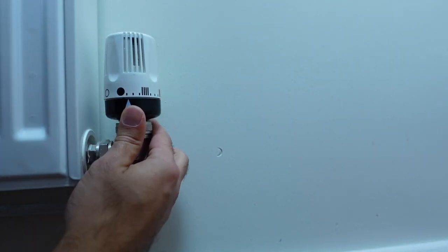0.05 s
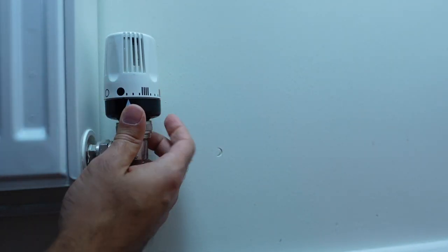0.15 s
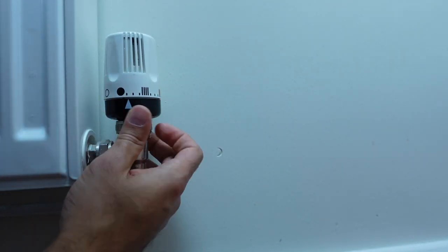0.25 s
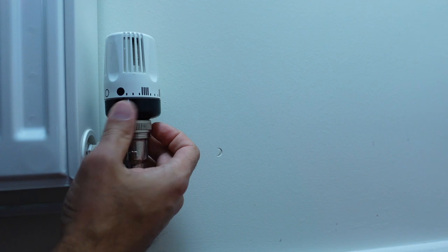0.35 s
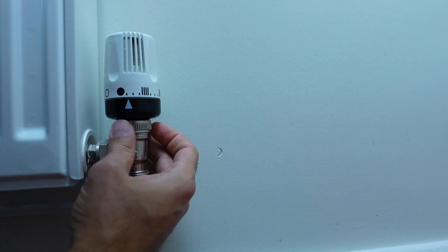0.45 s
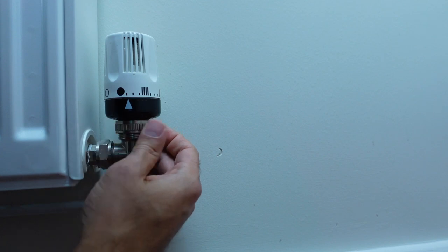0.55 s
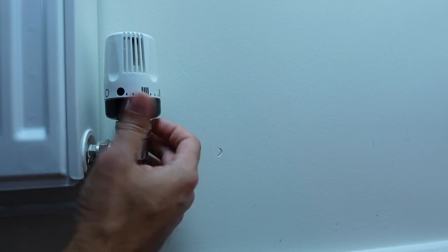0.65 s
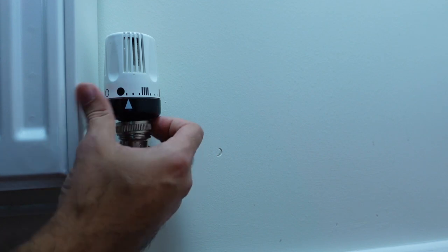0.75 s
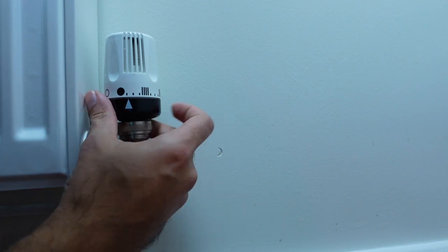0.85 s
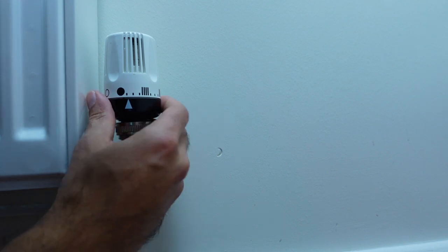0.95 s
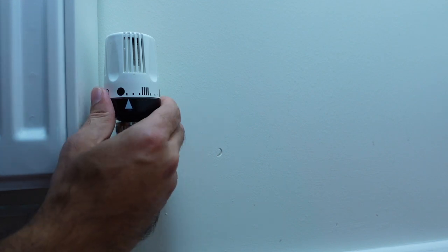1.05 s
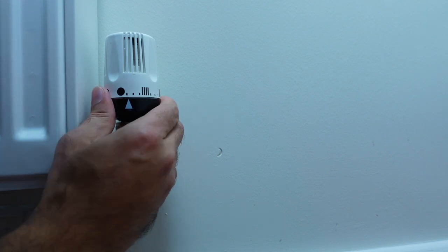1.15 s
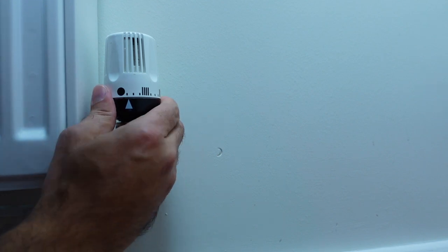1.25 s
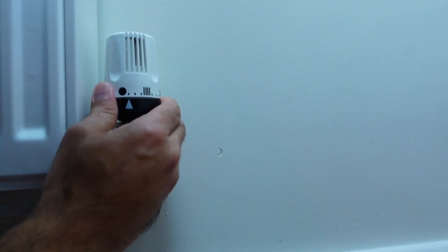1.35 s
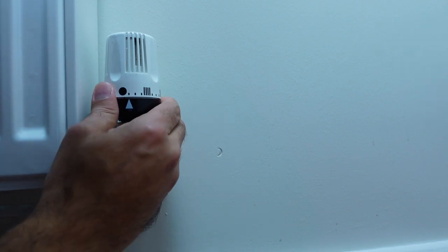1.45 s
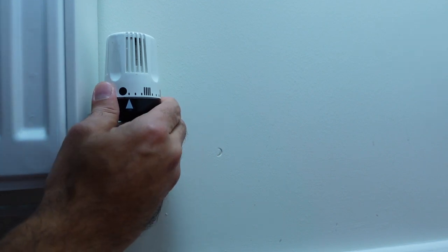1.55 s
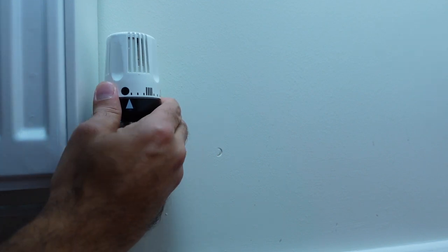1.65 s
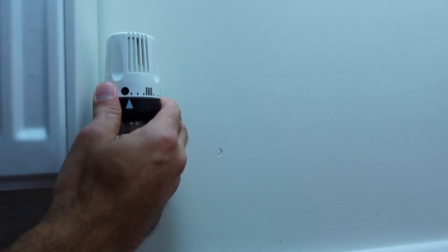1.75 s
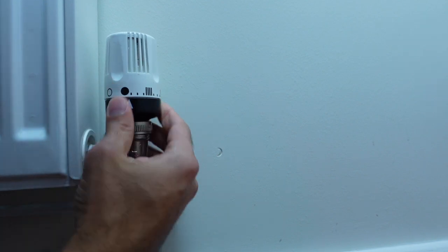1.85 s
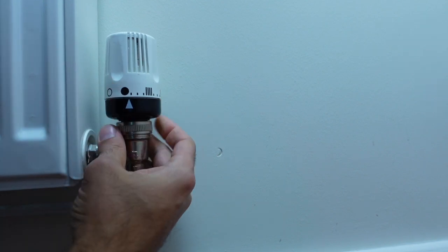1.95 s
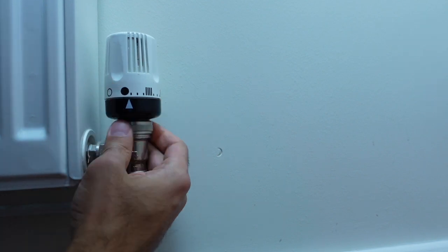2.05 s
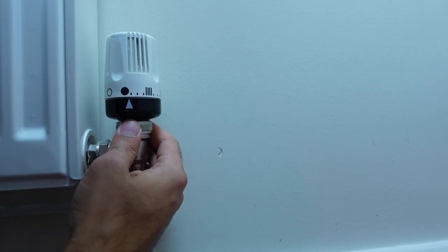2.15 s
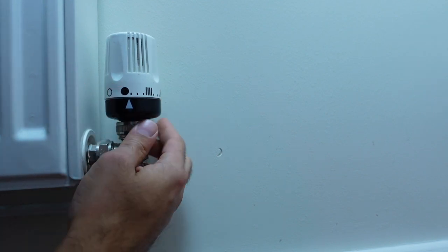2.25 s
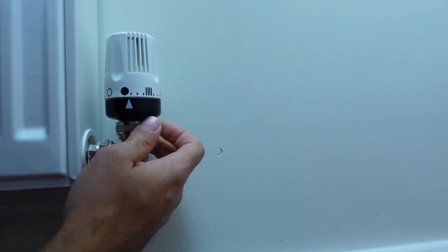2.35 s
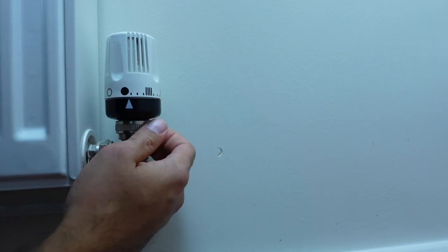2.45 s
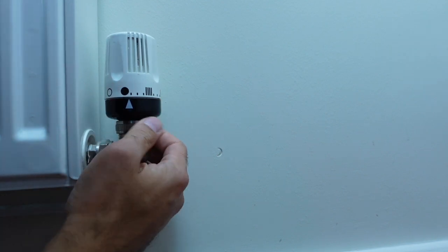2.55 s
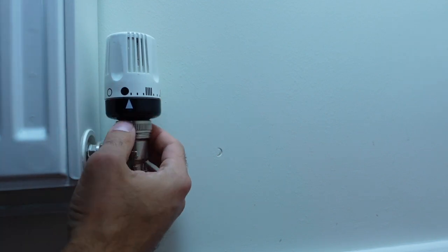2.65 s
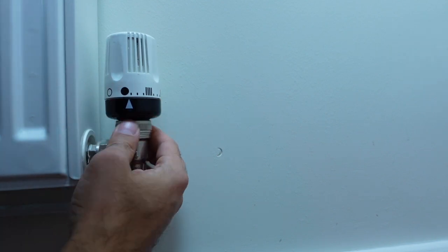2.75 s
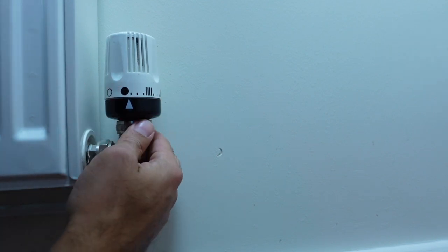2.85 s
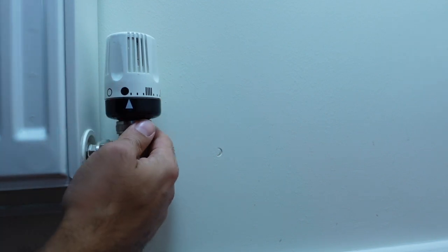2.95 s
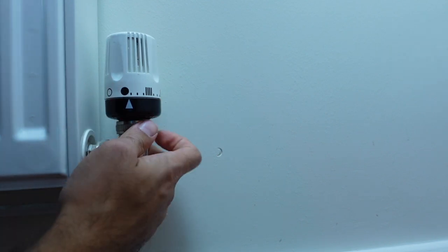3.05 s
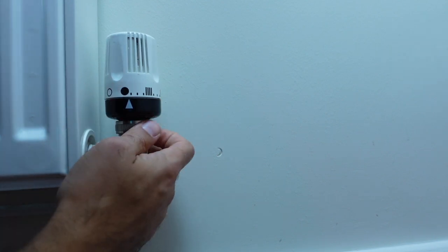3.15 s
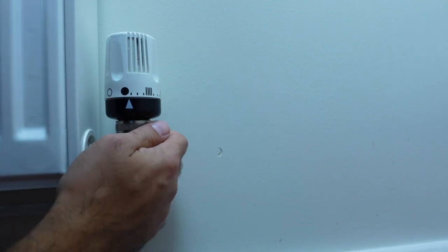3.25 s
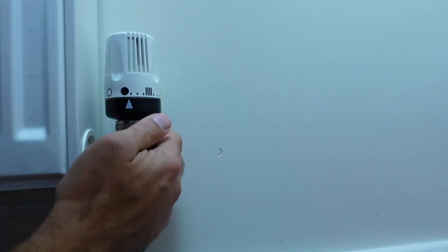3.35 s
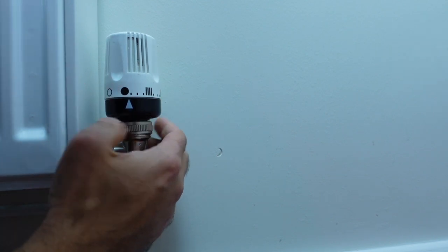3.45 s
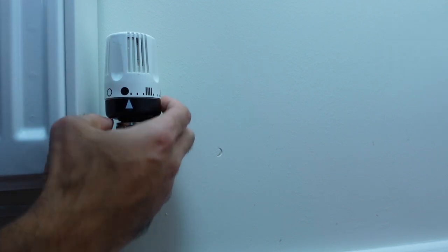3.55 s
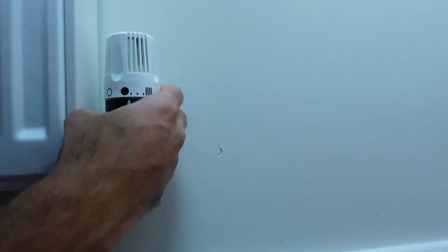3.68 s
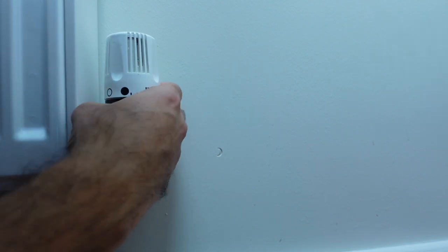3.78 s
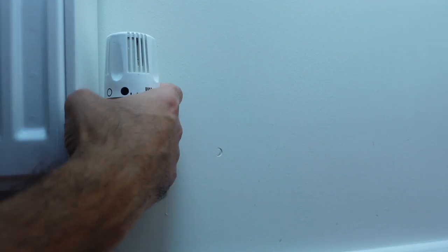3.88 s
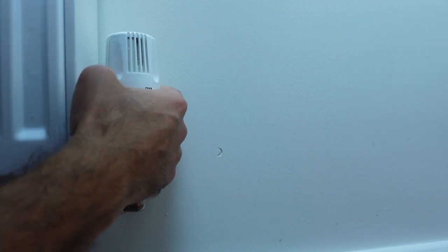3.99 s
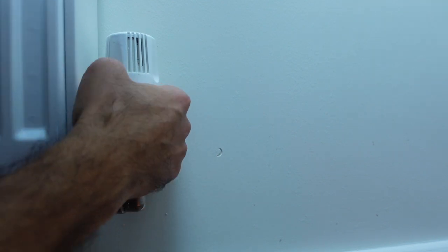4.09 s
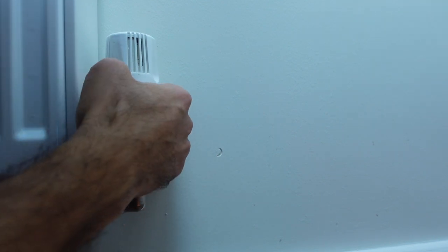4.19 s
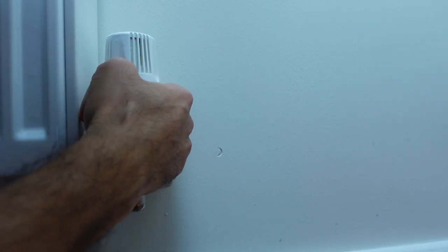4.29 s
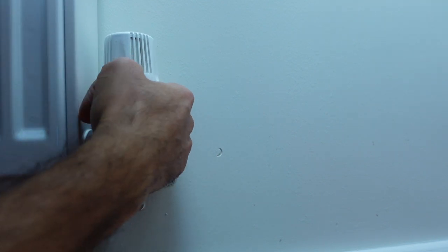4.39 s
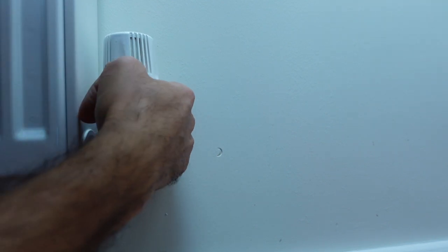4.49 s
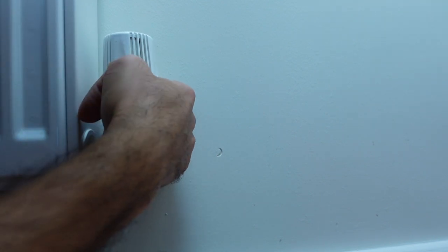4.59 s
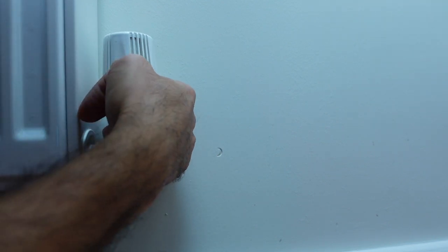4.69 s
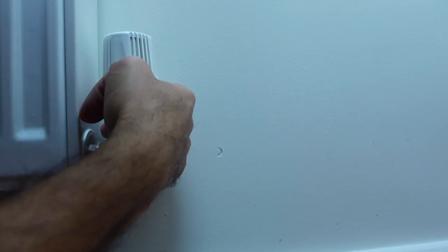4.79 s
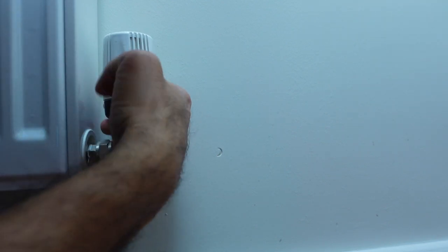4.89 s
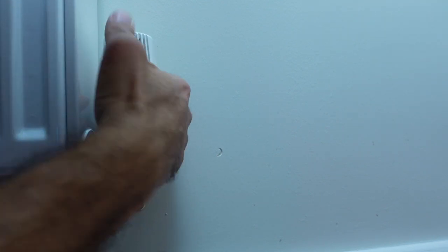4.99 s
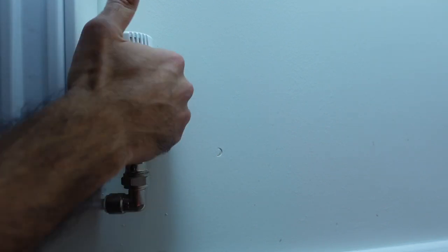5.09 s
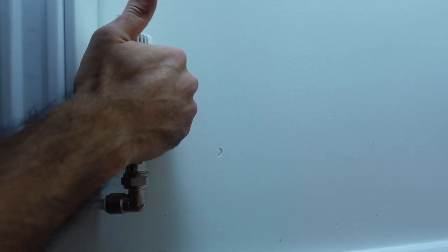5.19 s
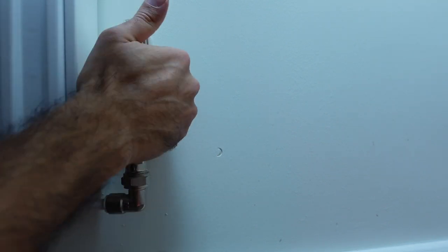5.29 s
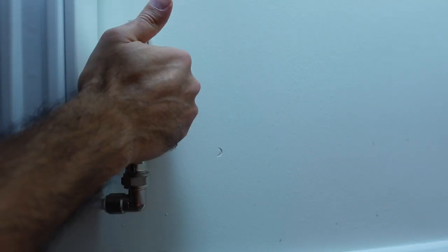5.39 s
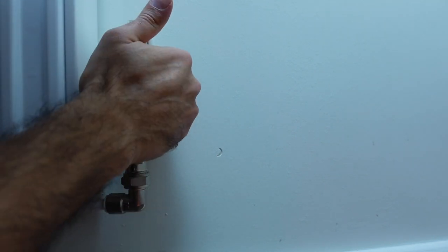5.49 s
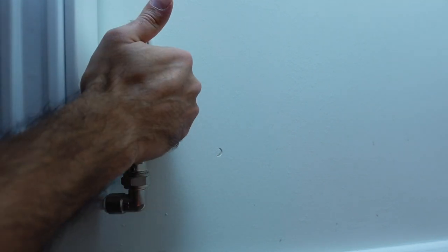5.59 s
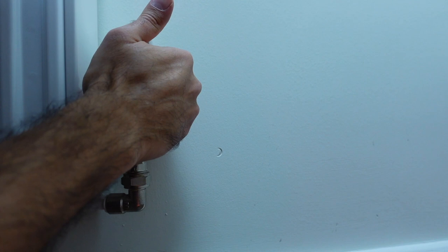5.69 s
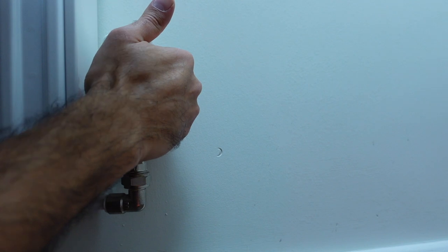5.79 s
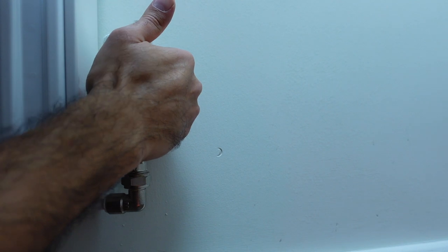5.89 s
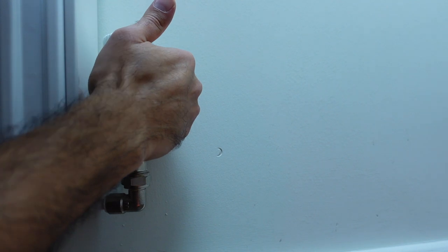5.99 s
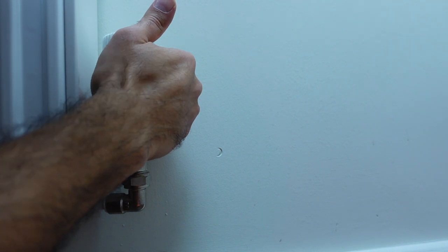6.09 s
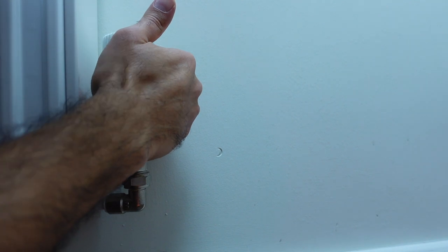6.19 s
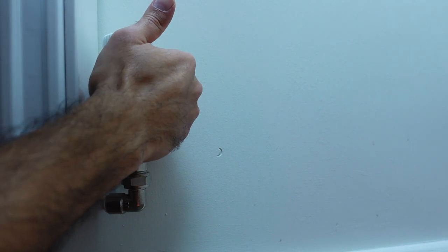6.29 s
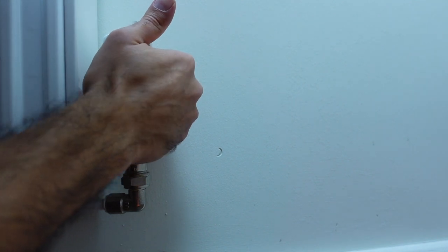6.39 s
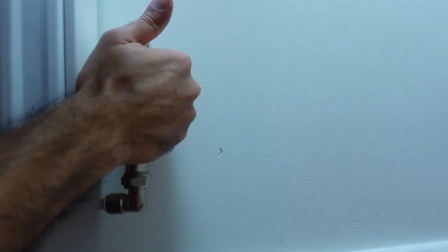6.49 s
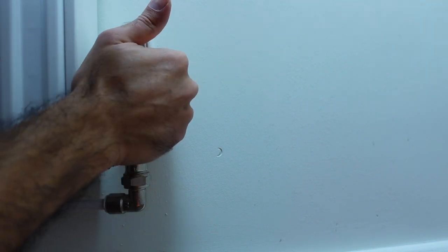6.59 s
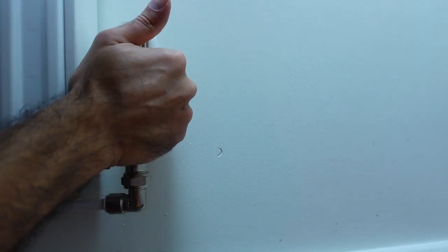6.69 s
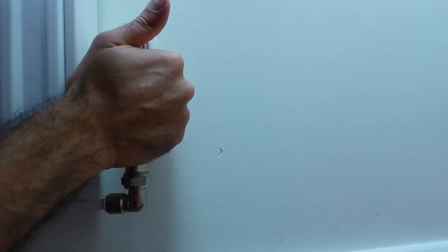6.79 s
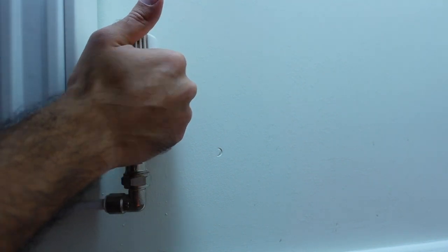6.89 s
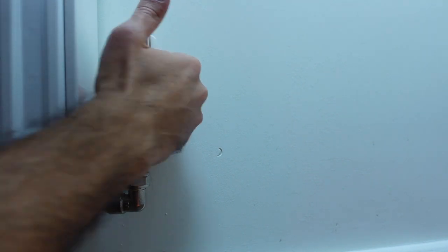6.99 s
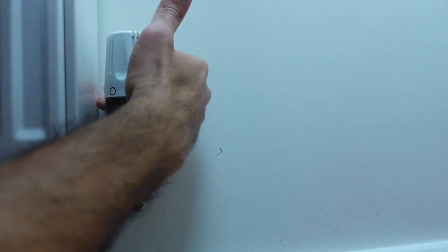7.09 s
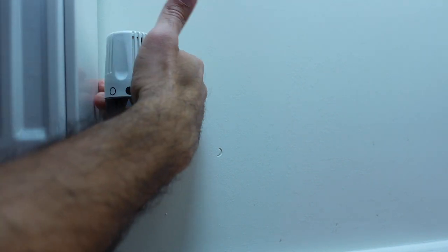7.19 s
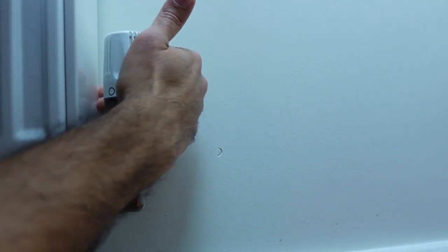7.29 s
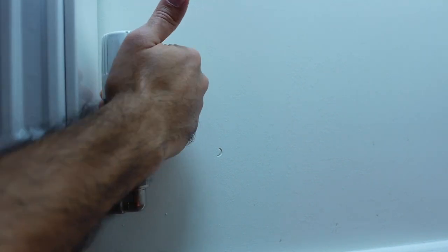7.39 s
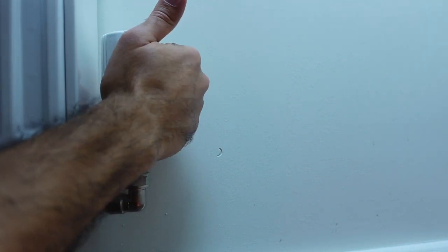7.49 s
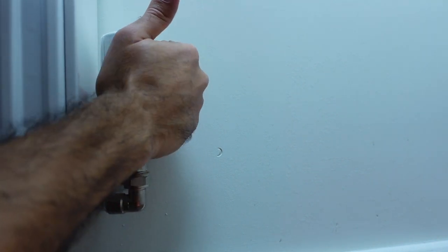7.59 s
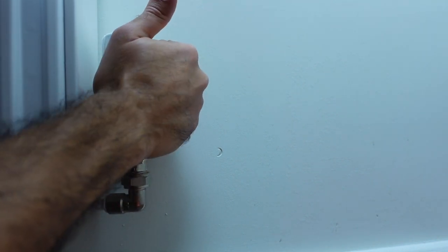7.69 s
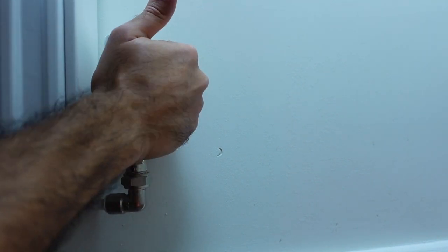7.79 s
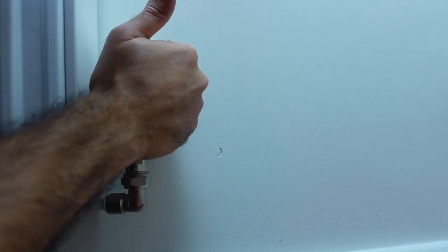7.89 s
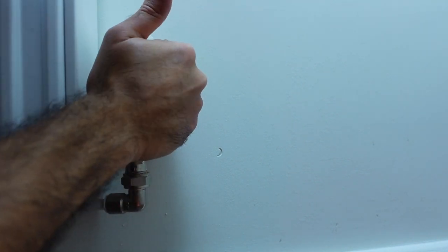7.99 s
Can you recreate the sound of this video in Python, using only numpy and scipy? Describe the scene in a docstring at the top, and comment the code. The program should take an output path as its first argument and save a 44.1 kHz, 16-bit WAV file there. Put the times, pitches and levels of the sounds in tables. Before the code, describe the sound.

Short jerky rasps of a metal thread come in two clusters, with bright collar clinks, the strongest near the middle. Soft plastic ticks and skin rubbing follow, nearly quiet. Then a very bright, loud snap bursts out and rings off the hard walls, followed by a dull padded knock on the pipe and light handling. Heard close, over quiet air and low panel rumble.

```python
"""Unscrewing a radiator valve head

A hand unscrews the metal collar of a plastic valve head in a bare, ringing room: the thread scrapes by stick-slip.
The loose collar clinks and the plastic shell ticks as struck modes, and each contact also rings the pipe.
The head snaps off with a sharp noise crack, bumps heavily on the valve as damped pipe and panel modes,
and is shifted about in the fingers with hissing and squeaking skin. Filtered noise gives air and rumble."""
import sys
import numpy as np
from scipy import signal
from scipy.fft import rfft, irfft
from scipy.io import wavfile

SR = 44100
rng = np.random.default_rng(int(sys.argv[2]) if len(sys.argv) > 2 else 0)


def master(y):
    """Save y as 16-bit WAV."""
    cut = np.clip(np.atleast_2d(y).T, -1, 1)
    pcm = np.round(cut * 32767)  # scale
    wavfile.write(sys.argv[1], SR, pcm.astype(np.int16))


N = 354563
TAIL_S = np.arange(SR) / SR  # time axis of one contact


def undb(db):
    """Level to amplitude: decibels become a gain."""
    return 10 ** (np.asarray(db) / 20)


def unit(x):
    """Power normalisation: scale to rms 1."""
    return x / np.sqrt(np.mean(x ** 2))


def blow(x, db):
    """Onset level: scale a hit so that the rms of its first 20 ms has this level."""
    return x * undb(db) / np.sqrt(np.mean(x[:SR // 50] ** 2))


def add(out, start_s, x):
    """Superposition: mix x in from this time."""
    i = max(int(start_s * SR), 0)
    out[i:i + len(x)] += x[:len(out) - i]


def through(x, response):
    """Convolution: a linear system answers x with its impulse response."""
    return signal.fftconvolve(x, response)[:len(x)]


def on_log_axis(hz, points):
    """Logarithmic pitch axis: read (hz, value) points at these frequencies."""
    f, value = np.transpose(points)
    return np.interp(np.log(hz + 1), np.log(f), value)


def colour(x, points, size=8192):
    """Minimum phase: a causal filter made from a spectrum of (hz, level_db) points."""
    log_gain = np.log(undb(on_log_axis(np.fft.rfftfreq(size, 1 / SR), points)))
    cepstrum = irfft(log_gain)
    # folding the cepstrum onto positive times makes the filter causal
    cepstrum[1:size // 2] *= 2
    cepstrum[size // 2 + 1:] = 0
    return through(x, irfft(np.exp(rfft(cepstrum))))


def ring(modes):
    """Modal superposition: decaying sines with random phases for each contact point, at unit energy."""
    y = 0
    for hz, db, t60_s in modes:
        decay = np.exp(-np.log(1000) * TAIL_S / t60_s)
        y = y + undb(db) * decay * np.sin(2 * np.pi * (hz * TAIL_S + rng.random()))
    return y / np.sqrt(np.sum(y ** 2))


def favour(modes, hz, lift_db, octaves):
    """Modal excitation: the place of contact decides what speaks, so rows near hz are lifted."""
    lifted = []
    for f, db, *rest in modes:
        nearness = np.exp(-(np.log2(f / hz) / octaves) ** 2)
        lifted.append((f, db + lift_db * nearness, *rest))
    return lifted


def burst(decay_s):
    """Micro-slip at a contact: a crowd of tiny slips, as noise that decays exponentially."""
    return rng.standard_normal(len(TAIL_S)) * np.exp(-TAIL_S / decay_s)


def onset(rise_s):
    """Contact compliance: a soft contact builds up with this time constant."""
    return 1 - np.exp(-TAIL_S / rise_s)


def walk(rate_hz):
    """Slow random modulation: chance values of spread near 1, joined by straight lines."""
    knots = rng.standard_normal(4096)
    return np.interp(np.arange(N) / SR * rate_hz, np.arange(len(knots)), knots)


def slips(rate_hz, spread_db):
    """Stick-slip: impulses at random moments, a few much larger than the rest."""
    happens = rng.random(N) < rate_hz / SR
    size = undb(spread_db * np.minimum(rng.exponential(size=N), 4))
    return happens * rng.choice([-1, 1], N) * size


def gesture(start_s, length_s, attack_s, swell_db, release_s):
    """Force envelope: a hand movement takes hold, swells to full force at its end and dies away."""
    t = np.maximum(np.arange(N) / SR - start_s, 0)
    pressing = undb(swell_db * np.minimum(t / length_s - 1, 0))
    letting_go = np.exp(-np.clip((t - length_s) / release_s, 0, 20))
    return (1 - np.exp(-t / attack_s)) * pressing * letting_go


# decay of the bare room. Columns: frequency_hz, t60_s
ROOM_DECAY = [(100, 1.2), (500, 0.7), (1500, 0.69), (4000, 0.55), (6500, 0.56), (10000, 0.34),
              (15000, 0.39)]


def walls(build_s):
    """Reverberation: a dense unit-energy tail builds up, each band decaying at its own rate."""
    noise = rfft(rng.standard_normal(len(TAIL_S)))
    octave = np.log2(np.fft.rfftfreq(len(TAIL_S), 1 / SR) + 1)
    tail = 0
    for centre in np.arange(4, 15, .5):
        band = irfft(noise * np.maximum(1 - 2 * abs(octave - centre), 0), len(TAIL_S))
        t60_s = on_log_axis(2 ** centre, ROOM_DECAY)
        tail = tail + band * np.exp(-np.log(1000) * TAIL_S / t60_s)
    tail = tail * onset(build_s)
    return tail / np.sqrt(np.sum(tail ** 2))


# spectra of the room air and of the panel's rumble. Columns: frequency_hz, relative_level_db
AIR_SPECTRUM = [(15, -30), (25, -3), (55, 2.5), (113, -18), (144, -7), (260, -16), (289, -8), (322, -24.5),
                (482, -15.5), (1110, -23.5), (1240, -35.5), (5880, -43), (8810, -43), (15500, -46.5)]
RUMBLE_SPECTRUM = [(20, -12.5), (38, -13), (50, 1), (67, 2), (90, -6), (120, -23), (300, -36),
                   (1000, -66.5)]
# modes of the radiator panel. Columns: frequency_hz, relative_level_db, t60_s
PANEL_MODES = [(53.4, -2.5, .45), (68.3, 5.5, .5), (87, 4.5, .33), (154.5, -12, .5), (237, -19, 0.36),
               (292, -20, .5)]
# the hand leans on the valve and sets the panel swaying. Columns: start_s, relative_level_db
PANEL_NUDGES = [(0.22, -35), (0.52, -39), (0.95, -45), (1.11, -42), (1.65, -38), (1.84, -39), (2.1, -41),
                (2.4, -41), (3.2, -42), (3.64, -38), (4.87, -43), (5.1, -43), (7.03, -40), (7.29, -41),
                (7.39, -41)]
PANEL_GAIN_DB = 35.5  # lifts a unit-energy panel ring, for nudges and bumps


def background():
    """Noise and forced modes: quiet room air, and a low panel rumble that sways further at each nudge."""
    air = unit(colour(rng.standard_normal(N), AIR_SPECTRUM)) * undb(-47.5 + 0.63 * walk(9.8))
    sway = unit(colour(rng.standard_normal(N), RUMBLE_SPECTRUM)) * undb(-50)
    for start_s, db in PANEL_NUDGES:
        add(sway, start_s, undb(db + PANEL_GAIN_DB) * ring(PANEL_MODES) * onset(0.02))
    return air + sway


# fingers slide over the knurling. Columns: start_s, length_s, relative_level_db
SKIN_SLIDES = [(0.0, .02, -48), (0.48, .1, -59), (0.68, .35, -53.5), (1.82, .06, -51), (1.93, .07, -50),
               (2.075, .105, -44), (2.24, .045, -36), (3.13, .29, -54), (3.46, .04, -35), (3.75, .29, -53),
               (4.86, .09, -48), (5.09, .04, -51), (6.92, .11, -45), (7.11, .125, -44), (7.33, .05, -57)]
# spectrum of the skin hiss. Columns: frequency_hz, relative_level_db
SKIN_SPECTRUM = [(500, -7), (2000, 1.5), (5000, 1.5), (8000, -2.5), (13000, -1), (16000, -7.5)]


def skin_slides():
    """Dense stick-slip: thousands of tiny slips a second merge into a hiss under the hand's force."""
    skin = unit(colour(slips(rate_hz=4400, spread_db=4.5), SKIN_SPECTRUM))
    out = np.zeros(N)
    for start_s, length_s, db in SKIN_SLIDES:
        force = gesture(start_s, length_s, attack_s=0.008, swell_db=4, release_s=0.025)
        out += force * undb(db - 5.5) * skin
    return out


# modes of the plastic shell. Columns: frequency_hz, relative_level_db, t60_s
SHELL_MODES = [(1505, -1, .04), (1760, 1, .04), (1990, -4, 0.05), (2265, -4.5, .07), (2700, -7, .03),
               (3050, -3, .06), (3637, -6, .03), (4560, -7, .03), (5990, -10, 0.052), (6200, -11, .04)]
# fingertips squeak on the shell. Columns: start_s, level_db, pitch_hz, length_s
SKIN_SQUEAKS = [(3.231, -46, 1650, 0.05), (4.415, -57, 1900, 0.041), (5.295, -65, 1970, 0.0395),
                (7.03, -48.5, 2330, 0.057)]


def squeaks():
    """Friction-driven resonance: quick stick-slip of skin, as noise, keeps a few shell modes going."""
    out = np.zeros(N)
    for start_s, db, pitch_hz, length_s in SKIN_SQUEAKS:
        swell = np.sin(np.pi * np.minimum(TAIL_S / length_s, 1))
        rub = rng.standard_normal(len(TAIL_S)) * swell
        squeak = through(rub, ring(favour(SHELL_MODES, pitch_hz, lift_db=15.5, octaves=.2)))
        rms = np.sqrt(np.sum(squeak ** 2) / (length_s * SR))
        add(out, start_s, undb(db) * squeak / rms)
    return out


# spectra of a contact's click, bright edge and knock. Columns: frequency_hz, relative_level_db
CLICK_SPECTRUM = [(300, -21.5), (900, -4.5), (1800, 0.5), (2400, 0), (3000, 1.5), (3700, 1.5), (4800, 1),
                  (6000, -6.5), (7000, 1.5), (8300, -14), (15000, -30.5)]
EDGE_SPECTRUM = [(1000, -29.5), (5000, -12.5), (8000, -3), (10000, 1.5), (13500, -3.5), (16000, -10.5)]
KNOCK_SPECTRUM = [(150, -27.5), (370, -22), (480, 5), (750, 1), (950, -2), (1250, -11.5), (2500, -25.5),
                  (6000, -39)]
# modes of the pipe and radiator. Columns: frequency_hz, relative_level_db, t60_s
PIPE_MODES = [(156, -18, 1), (236.5, -20, 0.66), (289.4, -15.5, 0.91), (361.3, -21.5, .4), (444.1, -7, .4),
              (473.7, -4, 0.44), (491.7, -9, 0.36), (509.4, 7, 0.073), (537.8, -4.5, 0.33),
              (580.4, -0.5, 0.19), (610, -10.5, 0.36), (655.8, 1.5, 0.31), (680, -11.5, 0.33),
              (773, -6.5, 0.34), (839, -10.5, 0.27), (912.6, -11, 0.22), (936, -8.5, 0.52),
              (1053, -12, 0.11), (1153, -16.5, 0.47), (1203, -9, 0.22), (1497, -5.5, 0.084),
              (1822, -13.5, 0.092), (2420, -24.5, .08)]


def contacts(table, modes, decay_s, edge_db, click_db, ring_db, knock_db, pipe_db, loose_s, loose_db):
    """Impact excitation: click, bright edge and ring of the part that is hit, and a knock down the pipe.
    A harder contact gives more edge and less knock; a part rings louder once it is loose."""
    out = np.zeros(N)
    for start_s, db, hard_db, pitch_hz, dry_db in table:
        hit = burst(decay_s) * onset(0.0005)
        edge = colour(hit, EDGE_SPECTRUM)
        click = colour(hit, favour(CLICK_SPECTRUM, pitch_hz, lift_db=5, octaves=0.35))
        ringing = ring(favour(modes, pitch_hz, lift_db=11.5, octaves=0.16)) * onset(0.0012)
        freedom_db = (start_s > loose_s) * loose_db
        knock = colour(burst(0.0055) * onset(0.0008), KNOCK_SPECTRUM)
        down_pipe = blow(knock, knock_db) + blow(ring(PIPE_MODES), pipe_db)
        add(out, start_s, blow(edge, db + hard_db + edge_db))
        add(out, start_s, blow(click, db + dry_db + click_db))
        add(out, start_s, blow(ringing, db + freedom_db + ring_db))
        add(out, start_s, undb(db - hard_db) * down_pipe)
    return out


# the head comes free. Columns: start_s, crack_db, shell_ring_db, room_db
HEAD_SNAP = (6.100, -10.5, -29, -20.5)
# ticks of the shell. Columns: start_s, relative_strength_db, hardness_db, favoured_pitch_hz, relative_click_db
SHELL_TICKS = [(0.2834, -34, -7, 2900, 4), (0.5594, -48, -4, 2050, -10), (0.837, -39, -5, 2050, -4),
               (1.3324, -51, -8, 1430, -14), (1.6217, -44, -3, 1430, -12), (1.7838, -44, -2, 1500, -12),
               (1.8118, -37, 1, 1780, -7), (1.8991, -45, 4, 3120, -3), (2.0408, -44.5, -11.5, 1520, -9),
               (2.1106, -36, -7, 1590, -4), (2.7512, -43, -10, 1540, -9), (3.1353, -42, -3, 1440, -8),
               (3.2234, -43, -8, 1520, -7), (3.7798, -40, -3, 1490, -6), (4.2537, -41.5, -3, 1527, -10),
               (4.5584, -48, -7, 4090, -3), (4.7222, -53, 4, 1474, -7), (4.8085, -44, -2, 4400, -4),
               (4.8414, -35, 1, 1740, -6), (4.9814, -44, -10, 1790, -2), (5.019, -44, 3, 5280, -5),
               (5.6336, -45, 0, 3310, -8), (6.9834, -43, -5, 5400, 1), (7.015, -39, 2, 2930, -2),
               (7.0344, -36, -3, 2243, 0), (7.1452, -42, 5, 2910, -3), (7.3084, -45, -1, 5960, -5),
               (7.3248, -42, -3, 3040, -2), (7.345, -50, -14, 4500, -2), (7.4204, -48, -3, 4500, 3),
               (7.6111, -52, 5, 5420, -7), (7.7348, -48, 5, 2570, -4), (7.8264, -50, -10, 1920, -1)]


def shell_ticks():
    """Impact on damped plastic: short, dull modes, which ring more freely after the snap."""
    return contacts(SHELL_TICKS, SHELL_MODES, decay_s=0.0058, edge_db=-14, click_db=-6.5, ring_db=-19.5,
                    knock_db=-6.5, pipe_db=-7, loose_s=HEAD_SNAP[0], loose_db=12)


# modes of the metal collar. Columns: frequency_hz, relative_level_db, t60_s
COLLAR_MODES = [(3055, -12, .04), (3570, -7, .03), (3790, -5, 0.07), (4050, -10.5, .04), (4830, -3, 0.063),
                (5120, -14.5, 0.13), (6100, -9, .04), (6880, -1.5, 0.057), (6940, -10.5, .08),
                (7100, -8, .06), (7455, -6, 0.044), (9570, -1, 0.058), (9660, -3.5, .1), (9740, -2, .1),
                (9814, -5.5, 0.064), (10500, -9, 0.0405), (11200, -13, .025), (12900, -12, .03)]
# clinks of the collar. Columns: start_s, relative_strength_db, hardness_db, favoured_pitch_hz, relative_click_db
COLLAR_CLINKS = [(0.099, -35, 2, 9630, -3), (0.1782, -31.5, -3, 3400, 5), (0.7974, -42, -4, 3800, -8),
                 (0.8996, -36, -3, 10100, -3), (2.0663, -36, -8, 4810, -8), (2.175, -42, -8, 4900, -6),
                 (2.2633, -26, -3, 9750, -13), (2.2784, -32, -6, 4740, 1), (2.378, -27.5, 5, 8500, -2),
                 (2.441, -28.5, -1, 7500, -5), (2.804, -34.5, -3, 5370, -1), (2.83, -36, -10, 7010, -4),
                 (2.8622, -31, 4, 4300, 3), (3.459, -23, 11, 8600, -1), (3.4697, -21, 3, 3750, -9),
                 (3.48, -17.5, 7, 9700, -7), (4.9302, -43, -5, 4500, 2)]


def collar_clinks():
    """Impact on stiff metal: high modes, which ring more freely once the collar leaves its thread."""
    return contacts(COLLAR_CLINKS, COLLAR_MODES, decay_s=0.0054, edge_db=-14, click_db=-7, ring_db=-10,
                    knock_db=-5.5, pipe_db=-8, loose_s=3.4, loose_db=5)


# turning strokes. Columns: start_s, length_s, relative_friction_db, relative_grit_db
THREAD_STROKES = [(0.0, .04, -24, -7), (0.105, .085, -30, -7), (0.27, .05, -29.5, 0), (0.53, .1, -47, -9),
                  (0.79, .1, -32, -7), (0.885, .065, -27, -8), (1.81, .1, -43, -6),
                  (1.925, .085, -30.5, -3), (2.06, .125, -29.5, 1), (2.22, .075, -23, 3),
                  (2.38, .09, -26, 0), (2.49, .14, -40, -1), (2.79, .09, -28, -2), (2.92, .07, -35, -8),
                  (3.14, .28, -35, -14), (3.47, .06, -28.5, -6), (3.6, .08, -42, -11), (3.77, .1, -48, 0),
                  (3.9, .13, -53, -3), (4.84, .15, -46, 2), (6.88, .17, -35, -8), (7.12, .1, -40, -10),
                  (7.33, .04, -45, 3), (7.46, .03, -48, -2)]
# spectrum of the fine grit. Columns: frequency_hz, relative_level_db
GRIT_SPECTRUM = [(200, -27), (400, -21.5), (560, -8), (760, 1.5), (840, -5.5), (930, -1), (1150, -8),
                 (1300, -13), (1550, -7), (2000, -11.5), (2500, -23.5), (5000, -30), (12000, -41.5)]


def thread_strokes():
    """Stick-slip friction: jerks of the thread ring the pipe, and finer grit rasps in collar and shell."""
    jerks = through(slips(rate_hz=450, spread_db=3.5), ring(PIPE_MODES))
    thread = unit(colour(jerks, [(300, -3), (490, 0.5), (600, -1.5), (900, -4), (2500, -15)]))
    grains = slips(rate_hz=500, spread_db=3)
    collar_rasp = unit(through(grains, ring(favour(COLLAR_MODES, 4900, lift_db=7, octaves=0.3))))
    shell_rasp = unit(through(grains, ring(SHELL_MODES)))
    grit = unit(colour(grains, GRIT_SPECTRUM)) + undb(-21) * collar_rasp + undb(-17) * shell_rasp
    out = np.zeros(N)
    for start_s, length_s, db, grit_db in THREAD_STROKES:
        force = gesture(start_s, length_s, attack_s=0.016, swell_db=4, release_s=0.036)
        out += force * undb(db - 7) * (thread + undb(grit_db) * grit)
    return out


def scraping():
    """Amplitude modulation: one random flutter moves the thread's scrape and the skin's hiss together."""
    return (thread_strokes() + skin_slides()) * undb(2.0 * walk(45))


# padded bumps on the valve. Columns: start_s, relative_pipe_db, relative_panel_db, relative_palm_db
VALVE_BUMPS = [(0.002, -29, -46, -54), (0.166, -36, -41, -54), (0.841, -38, -40.5, -39),
               (3.495, -31, -47.5, -45), (3.545, -34, -40, -47), (4.254, -43.5, -31, -47),
               (4.982, -50, -53.5, -44), (6.118, -27, -39, -35), (6.168, -22, -57.5, -44),
               (6.674, -14.5, -21, -36), (6.702, -27, -27, -40), (6.744, -21, -29, -40),
               (6.908, -38, -44, -39), (7.147, -51, -41, -37)]
# spectrum of the palm's thud. Columns: frequency_hz, relative_level_db
PALM_SPECTRUM = [(60, -19), (150, -0.5), (290, 0.5), (420, -6), (900, -23.5), (3000, -62.5)]
# scuff level at the reference blow, that blow's pipe level, and dB of scuff per dB of blow
SCUFF_DB, HEAVY_DB, SCUFF_SLOPE = -22, -15, 3.6


def bumps():
    """Soft, damped impact: low pipe modes boom, the panel follows, the palm thuds and the plastic scuffs.
    The scuff grows faster than the blow, so it belongs to the heavy bumps."""
    out = np.zeros(N)
    grip = onset(.002) * np.exp(-TAIL_S / .07)  # the hand softens the blow and damps the pipe
    for start_s, pipe_db, panel_db, palm_db in VALVE_BUMPS:
        boom = colour(ring(PIPE_MODES) * grip,
                      [(300, -6), (470, 0), (530, -2), (620, -8), (1200, -10), (2500, -15.5)])
        scuff = colour(burst(.013) * onset(0.0026),
                       [(300, -12.5), (900, 16), (1500, -2), (3500, -2.5), (7000, -8.5), (11000, -11.5),
                        (15000, -20)])
        palm = colour(burst(.02) * onset(0.0036), PALM_SPECTRUM)
        scuff_db = SCUFF_DB + SCUFF_SLOPE * (pipe_db - HEAVY_DB)
        add(out, start_s, blow(boom, pipe_db - 1) + blow(scuff, scuff_db) + blow(palm, palm_db + 1.0))
        add(out, start_s, undb(panel_db + PANEL_GAIN_DB) * ring(PANEL_MODES) * onset(0.0075))
    return out


# spectra of the crack and of the clap the walls return. Columns: frequency_hz, relative_level_db
CRACK_SPECTRUM = [(200, -16), (600, -2), (1500, -5), (3000, -1), (4500, -3), (6000, 0), (11000, 0),
                  (14000, 2), (16000, -7)]
CLAP_SPECTRUM = [(100, -12), (350, -10), (550, 6), (750, 4), (1050, 7), (1400, 0), (2000, 1), (2700, -3),
                 (3600, -1), (4900, -5), (6200, 3), (7300, -5), (9300, -1), (13500, 0), (16000, -11)]


def snap():
    """Sudden release: a very short, bright crack rings the shell, and the walls return a fuller, fading clap."""
    start_s, crack_db, shell_db, room_db = HEAD_SNAP
    out = np.zeros(N)
    crack = colour(burst(.0019), CRACK_SPECTRUM)
    shell = ring(favour(SHELL_MODES, 6100, lift_db=15, octaves=.25))
    clap = colour(walls(build_s=.005), CLAP_SPECTRUM)
    add(out, start_s, blow(crack, crack_db))
    add(out, start_s, blow(shell, shell_db))
    add(out, start_s, blow(clap, room_db))
    return out


def scene():
    """Superposition in one room: the handling and its reverberation, the snap with its own clap, the background."""
    handling = collar_clinks() + shell_ticks() + scraping() + squeaks() + bumps()
    echo = undb(-6.5) * through(handling, walls(build_s=0.0028))
    return (handling + echo + snap() + background())[None]


def record(dry):
    """Clipping and band limiting: peaks overload the microphone at full scale, and the top is cut."""
    top_cut = signal.ellip(8, .2, 70, 15600, fs=SR, output="sos")  # order, ripple dB, stopband dB, edge Hz
    return signal.sosfilt(top_cut, np.clip(dry, -1, 1))


dry = scene()
out = record(dry)
master(out)
```